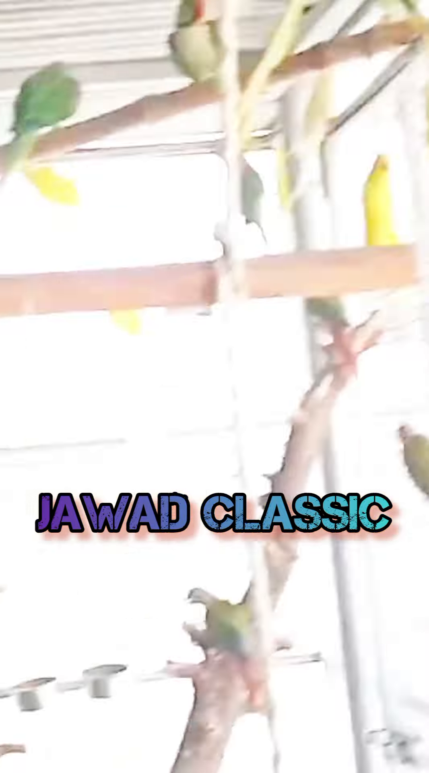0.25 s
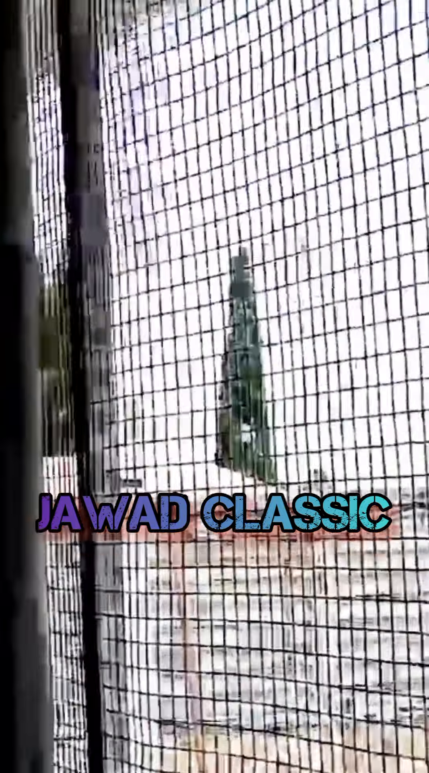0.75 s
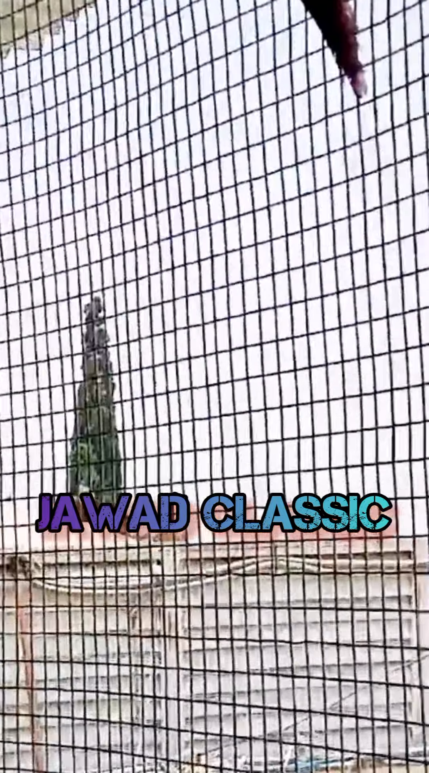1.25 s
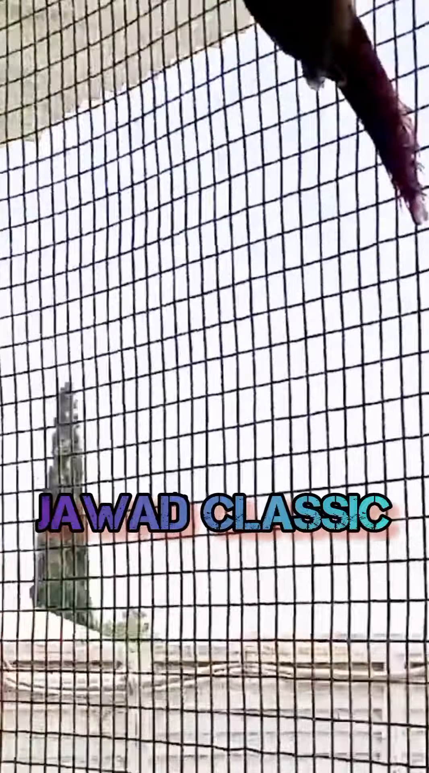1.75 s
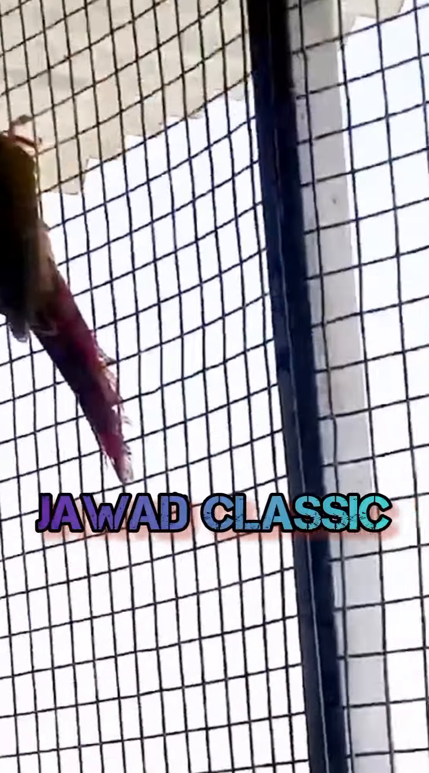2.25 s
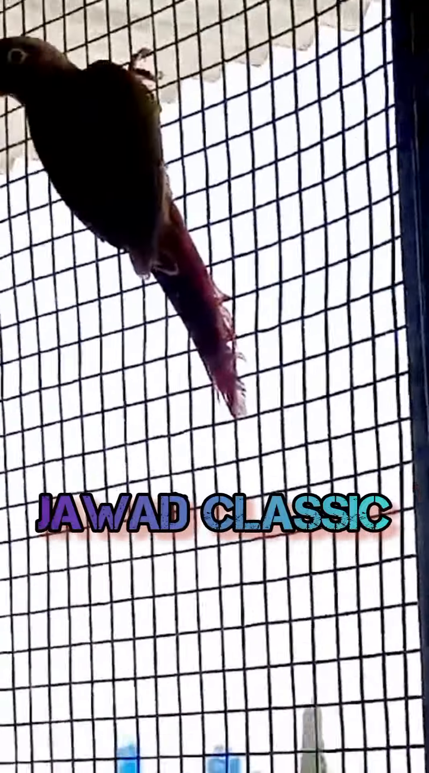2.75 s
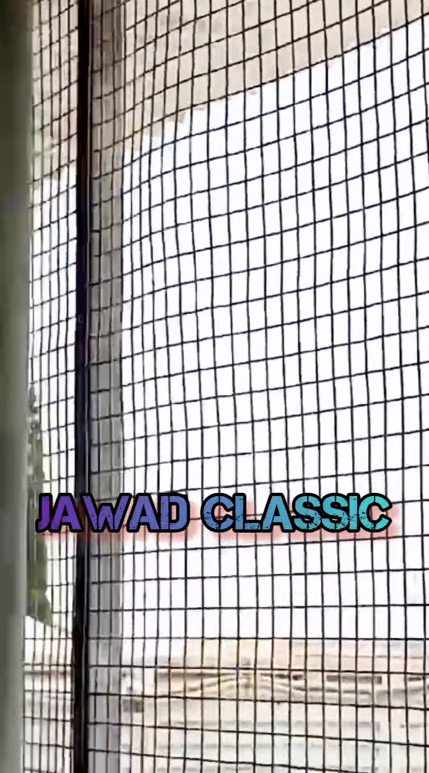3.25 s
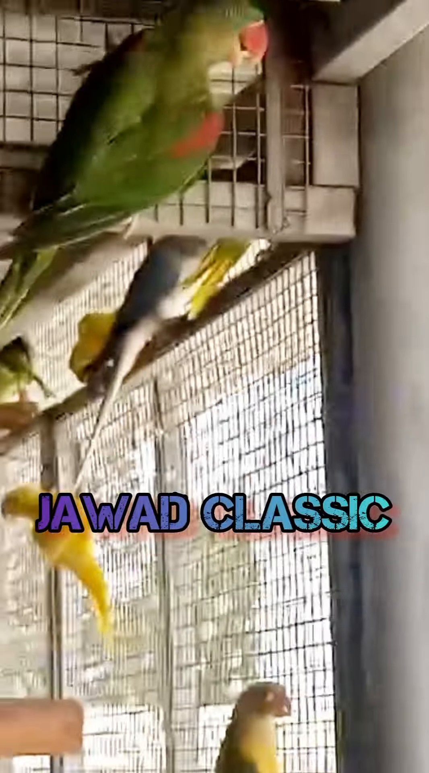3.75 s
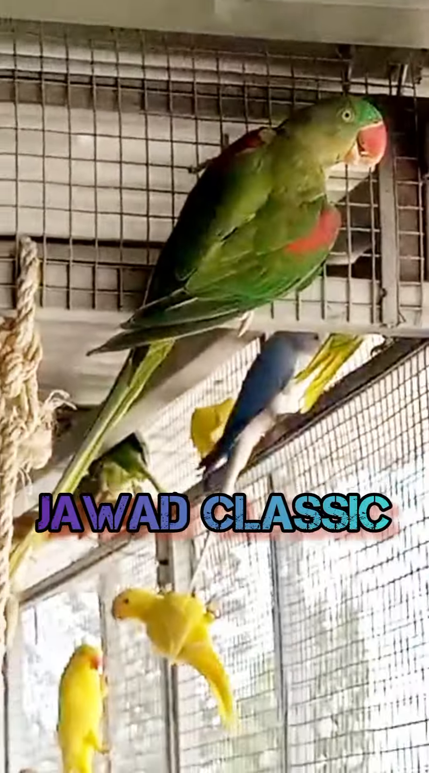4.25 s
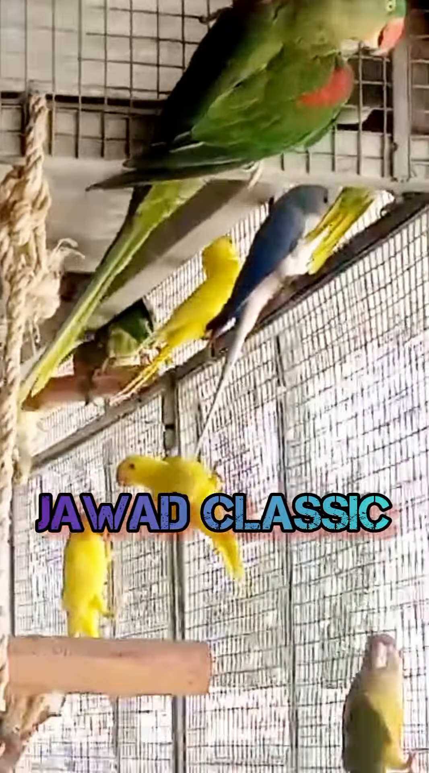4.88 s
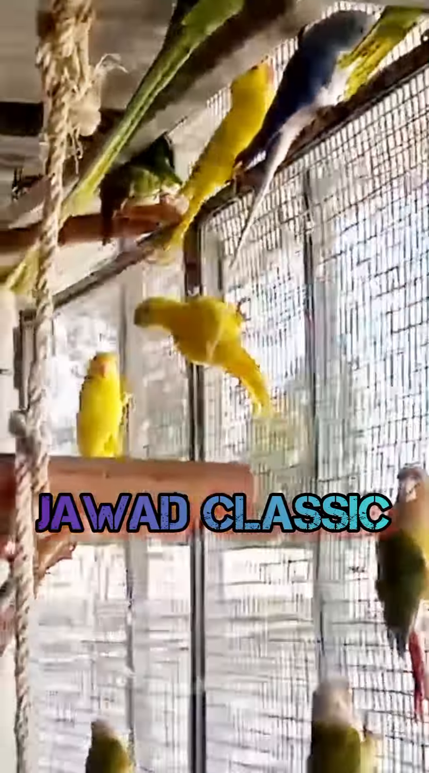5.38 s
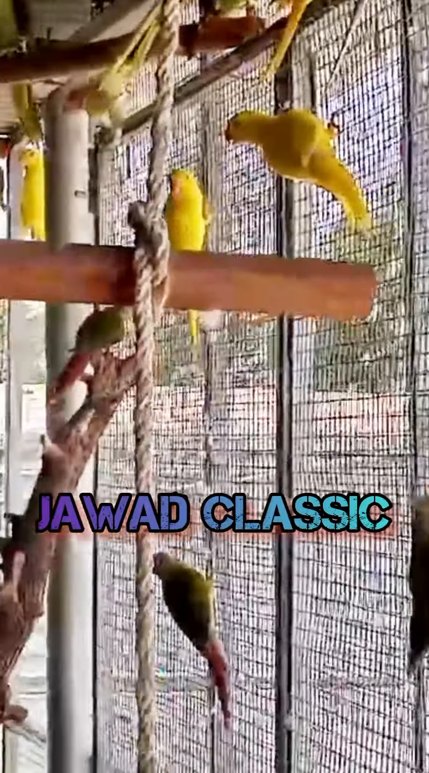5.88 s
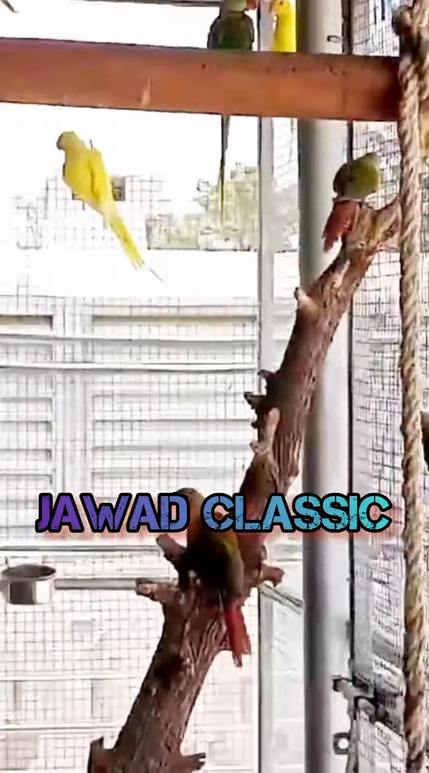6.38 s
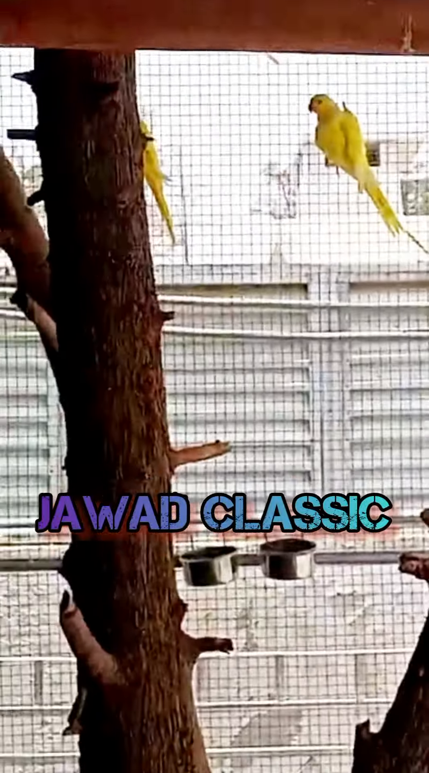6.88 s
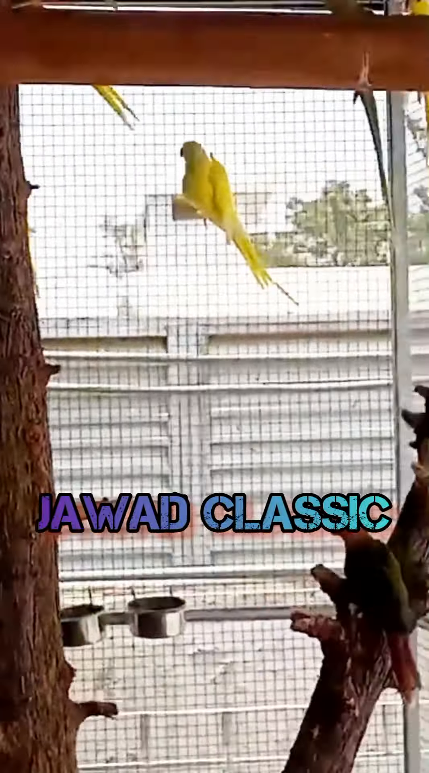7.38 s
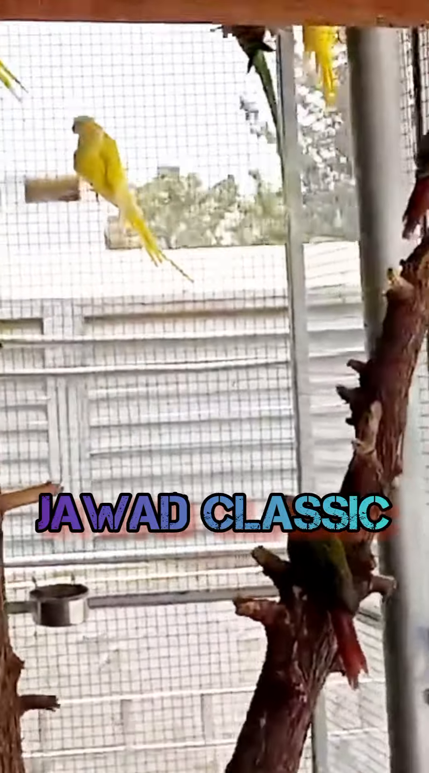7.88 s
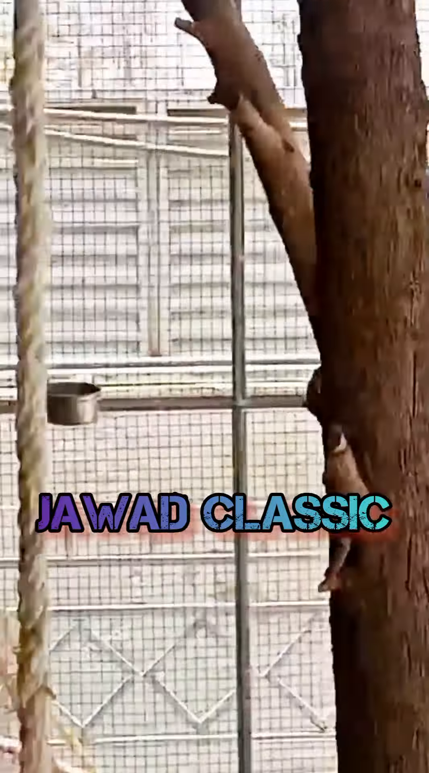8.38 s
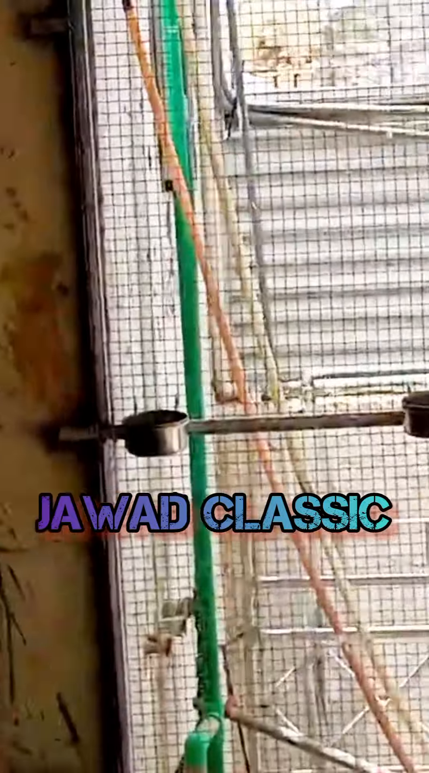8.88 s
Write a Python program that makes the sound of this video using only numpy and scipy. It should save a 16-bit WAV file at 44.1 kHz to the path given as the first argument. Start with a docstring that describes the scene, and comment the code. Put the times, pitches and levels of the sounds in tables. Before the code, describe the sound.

Shrill parakeet screeches, nasal squawks and brief whistles crowd together in an aviary, with dry scuffs and a far engine drone.

```python
"""Inside a wire-mesh parakeet aviary, its hard walls and sheet roof ringing after each call.
Dry scuffs sound over a low outdoor rumble. Near 1.7 s a bird screeches, the two sides of its syrinx
beating into a shrill rasp. Brief puffs of thin high hiss come now and then. Falling nasal squawks follow,
some led in by a clear whistle. From about 5 s a distant engine swells; the calls crowd together
and end in three loud screeches."""
import sys
import numpy as np
from scipy import signal
from scipy.fft import rfft, irfft, next_fast_len
from scipy.io import wavfile
from scipy.ndimage import uniform_filter1d

SR = 44100
rng = np.random.default_rng(int(sys.argv[2]) if len(sys.argv) > 2 else 0)


def generate_wav(sig):
    """Save sig (samples, or channels by samples) to the path in sys.argv[1] as 16-bit PCM at SR."""
    pcm = np.round(np.clip(np.atleast_2d(sig).T, -1, 1) * 32767).astype(np.int16)
    wavfile.write(sys.argv[1], SR, pcm)


N = 402633
TIME = np.arange(N) / SR
TOP_HZ = 15850  # upper limit at the microphone


def undb(db):
    """Decibels to gain."""
    return 10 ** (np.asarray(db) / 20)


def unit(x):
    """Scale to rms 1."""
    return x / np.sqrt(np.mean(x ** 2) + 1e-18)


def gain_at(hz, points):
    """Gain of a (Hz, dB) spectrum at the given frequencies."""
    f, db = np.transpose(points)
    return undb(np.interp(np.log(hz + 1), np.log(f), db))


def shape(x, response):
    """Filter by a gain that is a function of frequency."""
    size = next_fast_len(len(x))
    hz = np.arange(size // 2 + 1) * SR / size
    return irfft(rfft(x, size) * response(hz), size)[:len(x)]


def band(n, hz, width_hz):
    """Noise in one resonance, rms 1."""
    noise = rng.standard_normal(n)
    return unit(shape(noise, lambda f: 1 / (1 + ((f ** 2 - hz ** 2) / (f * width_hz + 1e-9)) ** 2)))


def wobble(n, hz):
    """Random motion mostly slower than hz, rms 1."""
    return unit(shape(rng.standard_normal(n), lambda f: 1 / (1 + (f / hz) ** 4)))


def turn(hz):
    """Running phase of a moving frequency."""
    return 2 * np.pi * np.cumsum(hz) / SR


def harmonics(phase, levels_db):
    """A tone with its overtones, each at its own rms level."""
    return np.sqrt(2) * sum(undb(db) * np.sin(k * phase) for k, db in enumerate(levels_db, 1))


def ramp(t, s):
    """Rise from 0 to 1 in s seconds."""
    return np.clip(t / s, 0, 1)


def gate(t, open_s, close_s):
    """A bird's airflow starts and stops smoothly."""
    return np.sin(np.pi / 2 * np.minimum(ramp(t, open_s), ramp(t[-1] - t, close_s))) ** 2


def play(rows, sound, **settings):
    """Mix one sound for each row, at the row's start time."""
    out = np.zeros(N)
    for start_s, *row in rows:
        x = sound(*row, **settings)
        i = int(start_s * SR)
        out[i:i + len(x)] += x[:max(N - i, 0)]
    return out


# Open air around the aviary. Each row: frequency in Hz, relative spectral level in dB.
AIR = [(15, -51.5), (25, -27.5), (53, -27), (74, -10.5), (102, -0.5), (235, -2), (269, -4), (437, -10),
       (881, -12), (1680, -16), (3050, -21.5), (4950, -30.5), (6660, -68.5), (8970, -27.5), (15800, -94)]
# Rumble from far off. Each row: time in seconds, relative level in dB.
RUMBLE = [(0, -42.5), (2.7, -53), (3.3, -42), (4.3, -41), (5.3, -36.5), (5.7, -52), (9.1, -44.5)]


def outdoors(air_db=-43.5, rumble_trim_db=-3):
    """Soft air noise that sways a little, over a distant rumble."""
    sway_db = .8 * wobble(N, hz=2)
    air = unit(shape(rng.standard_normal(N), lambda f: gain_at(f, AIR)))
    rumble = band(N, hz=124, width_hz=132)
    rumble_db = np.interp(TIME, *np.transpose(RUMBLE)) + rumble_trim_db
    return air * undb(air_db + sway_db) + rumble * undb(rumble_db)


def faint_hiss(db=-67, peak_db=-3, patchy_db=4, grain=.35):
    """A thin, grainy high hiss that comes and goes, strongest near 9 kHz."""
    peak = shape(band(N, hz=9100, width_hz=1800), lambda f: 1 / (1 + (7500 / (f + 1)) ** 12))
    hiss = band(N, hz=6200, width_hz=42000) + undb(peak_db) * peak
    hiss *= np.exp(grain * wobble(N, hz=90))
    return unit(hiss) * undb(db + patchy_db * wobble(N, hz=1.6))


# An engine well beyond the mesh. Each row: time in seconds, firings per second, level in dB.
ENGINE = [(4.8, 35, -58), (5.7, 32.2, -44), (6.2, 30, -43.5), (7.099, 30.7, -46.5), (7.8, 28.8, -47.5),
          (9.1, 26, -55)]
# Each entry: relative level in dB of one harmonic of the firing rate, lowest first.
ENGINE_HARMONICS = [-34, -14.5, -11, -8, -4.5, -4.5, -11, -19.5]


def engine(drift=.0076, waver_db=2):
    """A far engine drones at a slowly changing speed; each harmonic wavers in its own time."""
    times, firing_hz, db = np.transpose(ENGINE)
    phase = turn(np.interp(TIME, times, firing_hz) * (1 + drift * wobble(N, hz=5)))
    waver = waver_db * wobble(N, hz=1.5)
    levels_db = [level + np.roll(waver, k * SR) for k, level in enumerate(ENGINE_HARMONICS)]
    return unit(harmonics(phase, levels_db)) * undb(np.interp(TIME, times, db))


def aviary(x, direct_db=-2, tail_db=-3, low_t60_s=.46, treble_t60_s=.33, first_echo_s=.004):
    """Roof and walls return a few strong echoes that thicken into a tail, its treble dying first."""
    t = TIME[:SR]
    sparseness = 2 * np.exp(-t / .065)
    echoes = rng.standard_normal(SR) * np.exp(sparseness * np.clip(rng.standard_normal(SR), -2, 2))
    echoes /= np.sqrt(uniform_filter1d(echoes ** 2, size=400))  # even out the power before the decay
    low = shape(echoes, lambda f: 1 / (1 + (f / 5000) ** 4))
    tail = low * undb(-60 * t / low_t60_s) + (echoes - low) * undb(-60 * t / treble_t60_s)
    tail *= ramp(t - first_echo_s, .0014)
    ringing = signal.fftconvolve(x, unit(tail) / np.sqrt(SR))[:N]
    return undb(direct_db) * x + undb(tail_db) * ringing


# Dry scuffs, and brief puffs of thin high hiss near 9 kHz. Each row: start, rise and decay in seconds,
# relative level in dB, centre in Hz, added 9 kHz hiss in dB against the main band.
SCUFFS_AND_HISS_PUFFS = [ (0, 0.0022, 0.053, -39, 1210, -13), (.2, 0.1, 0.13, -46, 1770, -7),
                         (.48, 0.043, 0.04, -45, 1720, -15), (.73, .05, 0.089, -48.5, 2100, -19),
                         (1.066, 0.0091, 0.033, -35, 1600, -20), (1.291, .009, 0.053, -33, 1430, -18.5),
                         (2.08, 0.073, 0.048, -30.5, 1630, -14), (1.99, 0.023, 0.096, -56, 9000, 0),
                         (2.285, 0.0086, .045, -54, 9400, 2), (2.45, .06, 0.22, -47.5, 3000, -5),
                         (3.08, 0.042, 0.24, -52.5, 2370, -10), (3.32, 0.034, 0.086, -48.5, 2400, -3),
                         (4.317, .004, .035, -46, 3150, -9), (4.35, 0.034, 0.26, -47.5, 2230, -10),
                         (4.7, 0.048, .03, -34.5, 1770, -37), (5.07, .2, 0.053, -52, 2390, -6),
                         (5.865, 0.059, 0.02, -52, 8000, -20), (6.69, 0.019, 0.11, -42, 1397, -26),
                         (7.03, .015, 0.061, -51.5, 9000, -4), (8.275, .01, 0.051, -48, 8940, 12),
                         (8.36, 0.042, 0.088, -39, 2860, -23), (8.82, 0.043, 0.31, -37.5, 955, -15.5), ]
# Soft, low flutters in the enclosure. Each row reads as in the table above.
FLUTTERS = [(2.53, 0.022, .024, -36.5, 260, -17), (4.45, 0.033, 0.42, -35, 274, -46),
            (6.68, 0.041, 0.21, -37.5, 686, -29), (8.82, 0.049, 0.41, -41, 300, -26)]


def noise_puff(rise_s, decay_s, db, hz, hiss_db, spread, grain):
    """A band of grainy noise that swells and dies, with thin high hiss added."""
    t = TIME[:SR // 2]
    swell = ramp(t, rise_s) * np.exp(-np.maximum(t - rise_s, 0) / decay_s)
    body = band(len(t), hz, width_hz=spread * hz)
    hiss = undb(hiss_db) * band(len(t), hz=9000, width_hz=3900)
    grains = np.exp(grain * wobble(len(t), hz=120))
    return undb(db) * swell * unit((body + hiss) * grains)


# Brief whistles in the aviary, most just ahead of a squawk. Each row: start and length in seconds,
# first and last pitch in Hz, relative level in dB.
WHISTLES = [ (2.598, 0.059, 2240, 2070, -12), (5.685, 0.051, 2322, 2040, -21.5),
            (6.79, 0.012, 2360, 2300, -23.5), (7.146, .03, 2384, 2230, -19.5),
            (8.093, 0.059, 2371, 2280, -13.5), (8.775, 0.043, 2380, 2220, -19.5), ]
# Each entry: relative level in dB of one harmonic of a whistle, lowest first.
WHISTLE_HARMONICS = [4.5, -15.5, -37, -69]


def whistle(length, first_hz, last_hz, db, jitter=.015):
    """The syrinx in clean, even vibration: a held note that swells, then sags as it stops."""
    t = np.arange(0, length, 1 / SR)
    hz = first_hz + (last_hz - first_hz) * (t / length) ** 3
    phase = turn(hz * (1 + jitter * wobble(len(t), hz=250)))
    swell_db = np.interp(t / length, [0, .65, 1], [-14, 0, -11.5])
    return harmonics(phase, WHISTLE_HARMONICS) * undb(db + swell_db) * gate(t, open_s=.009, close_s=.004)


# The throat's colouring of a squawk. Each row: frequency in Hz, gain in dB.
THROAT = [(750, -3), (1050, -5), (1350, -5), (1800, 4.5), (2600, 3), (3300, -5.5), (4300, -11.5),
          (6200, -25.5), (7600, -36), (9000, -30.5), (11000, -50.5), (15000, -31)]


def squawk_voice(hz, rough, beak_hz, fundamental_db, treble_db,
                 rattle_hz=270, beak_db=7, beak_width_hz=450, flicker_db=6, hiss_db=-14, shimmer=.39):
    """A buzzing syrinx with uneven cycles; its harmonics slide through the throat and beak resonances."""
    n = len(hz)
    # driven hard, a slower unsteady mode of the membranes splits each harmonic into a hoarse cluster
    beat = .85 * rough ** 1.5 * np.cos(turn(rattle_hz * (1 + .25 * wobble(n, hz=60))))
    jitter = .05 * beat + rough * (.035 * wobble(n, hz=400) + .045 * wobble(n, hz=110))
    phase = turn(hz * (1 + jitter))
    order = np.arange(1, 17)[:, None]
    partial_hz = order * hz
    resonance_db = beak_db / (1 + ((partial_hz - beak_hz) / beak_width_hz) ** 2)
    treble = 1 / (1 + (3800 / partial_hz) ** 6) / (1 + (partial_hz / 12000) ** 12)
    colour_db = resonance_db + fundamental_db * (order == 1) + treble_db * treble
    flicker = treble * np.array([wobble(n, hz=70) for _ in order])
    weight = gain_at(partial_hz, THROAT) * undb(colour_db + flicker_db * flicker) * (partial_hz < TOP_HZ)
    buzz = np.sum(weight * np.sin(order * phase), axis=0) / np.sqrt(np.sum(weight ** 2, axis=0) / 2)
    puffs = rng.standard_normal(n) * (1 + np.cos(phase))  # air escapes once a cycle
    hiss = unit(shape(puffs, lambda f: gain_at(f, THROAT) / (1 + (1300 / (f + 1)) ** 8)))
    pressure = 1 + 2 * beat + shimmer * rough * wobble(n, hz=260)
    voice = unit(pressure) * (buzz + undb(hiss_db) * 2 * rough * hiss)
    # so small a bird radiates almost nothing below its lowest pitch
    return shape(voice, lambda f: 1 / (1 + (660 / (f + 1)) ** 12) / (1 + (f / 13000) ** 12))


# Falling squawks in the foreground. Each row: start and length in seconds, first and resting pitch in Hz,
# fall time in seconds, bow of the fall (1 drops at once, 3 lingers first), relative level in dB,
# attack in seconds, level change over the call in dB, roughness from 0 to 1, beak resonance in Hz,
# fundamental and treble gain in dB.
SQUAWKS = [ (2.637, 0.15, 1773, 813.3, 0.067, 2.23, -11.5, 0.019, -2.5, 0.547, 3140, -5.5, 3),
           (3.616, 0.16, 1344, 859, 0.061, 1.39, -19, 0.065, 0.5, 0.23, 2580, 7, -7.5),
           (3.842, 0.046, 3970, 3210, 0.025, 2.36, -16.5, 0.013, -1, 0.25, 3430, -5, 4),
           (3.873, 0.11, 2314, 1338, .097, 1.9, -18, 0.0035, 0.5, 0.25, 3850, -8.5, 7),
           (4.785, 0.16, 1390, 812, 0.064, 1.225, -12.5, 0.035, -6, 0.23, 1880, 2.5, 0.5),
           (5.725, 0.17, 1675, 1145, .1, 1.32, -20, 0.063, -7, 0.19, 2920, 1, -10),
           (6.231, 0.21, 1577, 804.2, 0.07, 1.7, -10, .06, -13.5, 0.24, 2150, -2, 2.5),
           (6.805, 0.19, 1109, 700, .11, 2.27, -13.5, 0.033, -11, 0.34, 2040, 3, -6.5),
           (7.165, .155, 1783, 1178, .068, 1.05, -18.5, 0.034, -7, 0.37, 3060, 0, -0.5),
           (7.895, 0.13, 1125, 690.5, 0.074, 1.45, -18.5, 0.034, -9.5, 0.24, 1718, 3.5, -14),
           (8.155, 0.21, 1424, 1042, 0.17, 2.1, -18.5, 0.0043, -9, 0.61, 2860, 2, -5),
           (8.535, .135, 1110, 771.4, .062, 2.33, -28.5, .01, 12.5, 0.25, 2440, 1.5, 2), ]


def squawk(length, first_hz, rest_hz, fall_s, bow, db, attack_s, fade_db, rough, beak_hz,
           fundamental_db, treble_db, onset_db=-15.5, end_db=-1.5, release_s=.021):
    """The syrinx relaxes: pitch sinks to rest and the beak follows; the voice is hoarsest in mid-call."""
    t = np.arange(0, length, 1 / SR)
    hz = rest_hz + (first_hz - rest_hz) * np.exp(-(t / fall_s) ** bow)
    ends_db = onset_db * (1 - ramp(t, attack_s)) + end_db * (1 - ramp(length - t, release_s))
    hoarse = rough * (.8 + .2 * np.sin(np.pi * t / length))
    moving_beak_hz = beak_hz * (hz / hz.mean()) ** .25  # the beak opens with pitch
    voice = squawk_voice(hz, hoarse, moving_beak_hz, fundamental_db, treble_db)
    return voice * undb(db + ends_db + fade_db * t / length) * gate(t, open_s=.007, close_s=.005)


# Each entry: relative level in dB of one harmonic of a screech, lowest first.
SCREECH_HARMONICS = [8.5, -17, -21, -47]
# The beak's filter on a screech. Each row: frequency in Hz, gain in dB.
BEAK = [(500, -5), (1200, -4), (2100, -3.5), (3300, 3), (4400, -1.5), (5500, 3.5), (6700, 5.5), (7700, 4.5),
        (9000, 11.5), (10300, -7.5), (11500, -7.5), (13500, 13)]


def screech_voice(hz, rasp, depth, jitter=.1656, throb=.28, sag=.091, blur_db=5):
    """One side of the syrinx sings high; the other beats at a third of that pitch, throwing sidebands."""
    n = len(hz)
    chaos = rasp ** 2  # the membranes break into noise only when driven hard
    flutter = band(n, hz=135, width_hz=36.4)
    # the pitch keeps slipping down from its ceiling and catching again
    droop = sag * np.sqrt(rasp) * np.maximum(wobble(n, hz=108.4) + flutter / 2, 0)
    phase = turn(hz * (1 - droop + jitter * chaos * wobble(n, hz=873)))
    second_voice = np.cos(turn(hz / 3 * (1 + .055 * wobble(n, hz=170))))
    pressure = (1 + 1.4 * depth * second_voice) * (1 + .45 * chaos * wobble(n, hz=750))
    # overtones need an even vibration
    levels_db = [db - blur_db * chaos * (k > 0) for k, db in enumerate(SCREECH_HARMONICS)]
    voice = harmonics(phase, levels_db) * pressure * np.exp(throb * flutter)
    return unit(shape(voice, lambda f: gain_at(f, BEAK)))


# Shrill answers, some loud at the microphone, some faint. Each row: start and length in seconds,
# crest pitch and final drop in Hz, relative level in dB, lead-in time in seconds, lead-in gain in dB,
# seconds until the break, then rasp and depth of the second voice on the crest, both from 0 to 1.
SCREECHES = [ (1.667, 0.18, 3325, 300, -12.5, .066, -11.5, 0.15, 0.15, 0.18),
             (2.385, 0.13, 3300, 100, -47, .04, 1, .08, 0.66, 0.8),
             (3.814, .036, 4050, 100, -29, 0.065, -1, 0.038, .8, .8),
             (5.433, 0.18, 3496, 380, -10.5, 0.06, -4, .16, 0.24, 0.19),
             (7.328, .177, 3490, 230, -11, .058, -6.5, .14, .22, 0.29),
             (7.52, .26, 3420, 110, -21.5, 0.046, 3, 0.23, 0.68, 0.57),
             (8.438, 0.14, 3498, 518, -8.5, .052, -5, 0.088, 0.04, .03),
             (8.692, .14, 3440, 558, -11.5, 0.059, -6.5, .092, .04, 0.24),
             (8.948, 0.17, 3420, 720, -11, .056, -7, 0.096, 0.05, 0.38), ]


def screech(length, crest_hz, drop_hz, db, lead_s, lead_db, break_s, crest_rasp, crest_depth,
            lead_dip=.1, lead_rasp=.904, crack_s=.012, break_db=-8, break_rasp=.31, break_depth=1.5,
            warble_hz=32, warble_dip=.0275, warble_depth=.15, warble_db=-3):
    """A raspy lead-in climbs to a ringing, warbling crest; the voice breaks into sidebands and sinks."""
    t = np.arange(0, length, 1 / SR)
    lead = 1 - ramp(t, lead_s) ** 2
    broken = ramp(t - break_s, crack_s)
    slip = np.maximum(wobble(len(t), warble_hz), 0) * (1 - lead)  # the voice slips now and then
    crest_progress = ramp(t - lead_s / 2, break_s + crack_s - lead_s / 2)
    arch = .0241 * (1 - np.sin(np.pi * crest_progress))  # both ends of the crest lie a little flat
    sink_hz = drop_hz * np.sin(np.pi / 2 * ramp(t - break_s, max(length - break_s, crack_s)))
    hz = crest_hz * (1 - lead_dip * lead ** 2 - arch - warble_dip * slip) - sink_hz
    rasp = np.clip(crest_rasp + (lead_rasp - crest_rasp) * lead + (break_rasp - crest_rasp) * broken, 0, 1)
    depth = crest_depth + (1 - crest_depth) * lead + (break_depth - crest_depth) * broken
    depth += warble_depth * slip
    level_db = db + lead_db * lead + break_db * broken + warble_db * slip
    return screech_voice(hz, rasp, depth) * undb(level_db) * gate(t, open_s=.024, close_s=.01)


def scene():
    """Birds and small noises ring in the enclosure over the outdoor background, heard in mono."""
    birds = play(SQUAWKS, squawk) + play(SCREECHES, screech) + play(WHISTLES, whistle)
    scuffs_and_hiss = play(SCUFFS_AND_HISS_PUFFS, noise_puff, spread=1.11, grain=.19)
    flutters = play(FLUTTERS, noise_puff, spread=1.1, grain=.3)
    return (aviary(birds + scuffs_and_hiss + flutters) + outdoors() + engine() + faint_hiss())[None]


def record(dry):
    """The phone's microphone rounds the loudest peaks and cuts the top."""
    rounded = dry / (1 + dry ** 8) ** (1 / 8)
    lowpass = signal.ellip(10, .2, 80, TOP_HZ, fs=SR, output="sos")
    return signal.sosfilt(lowpass, rounded)


dry = scene()
out = record(dry)
generate_wav(out)
```